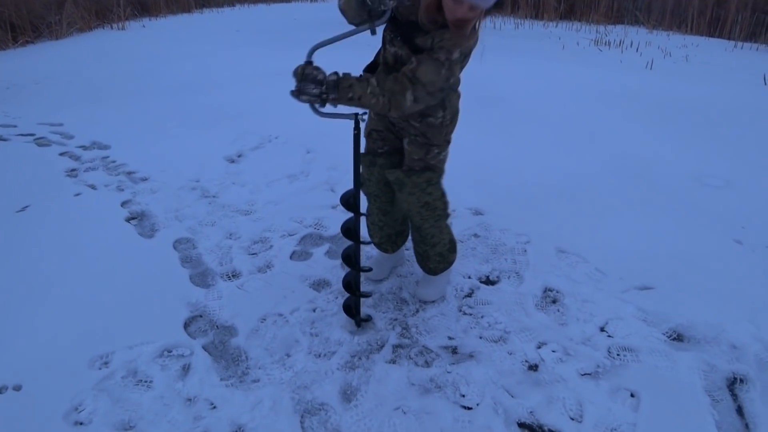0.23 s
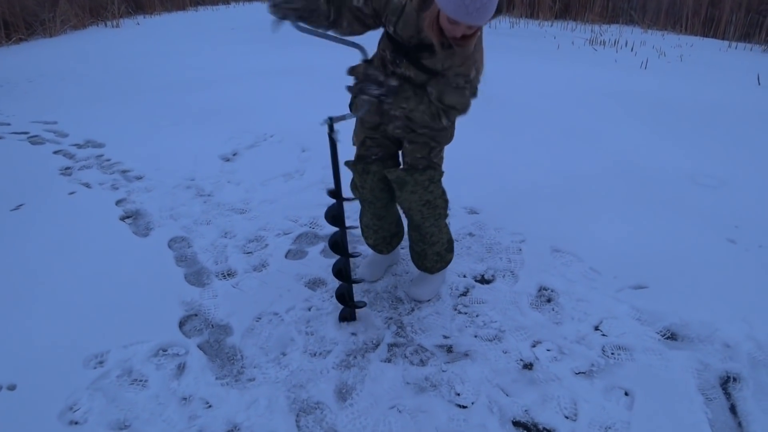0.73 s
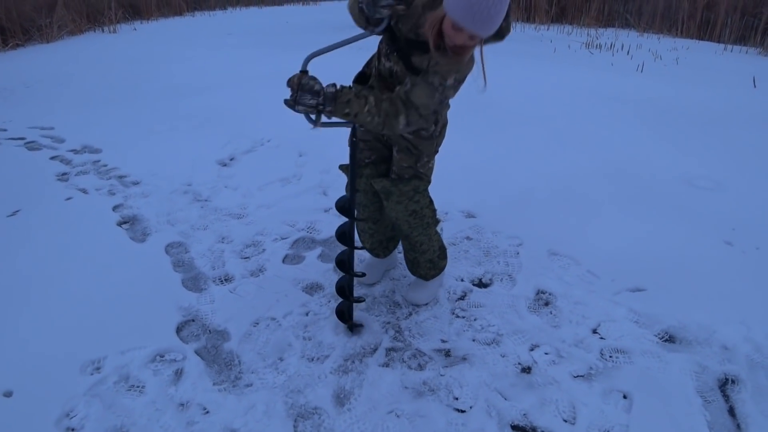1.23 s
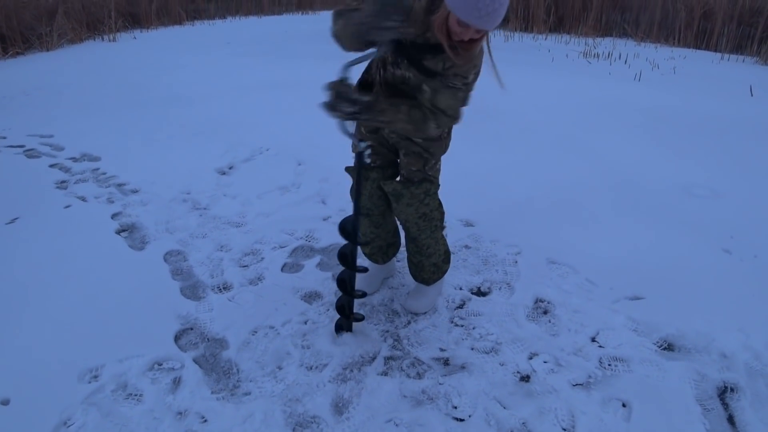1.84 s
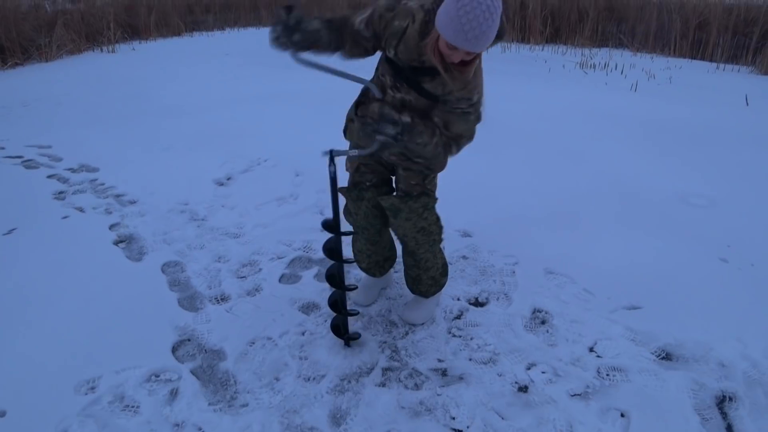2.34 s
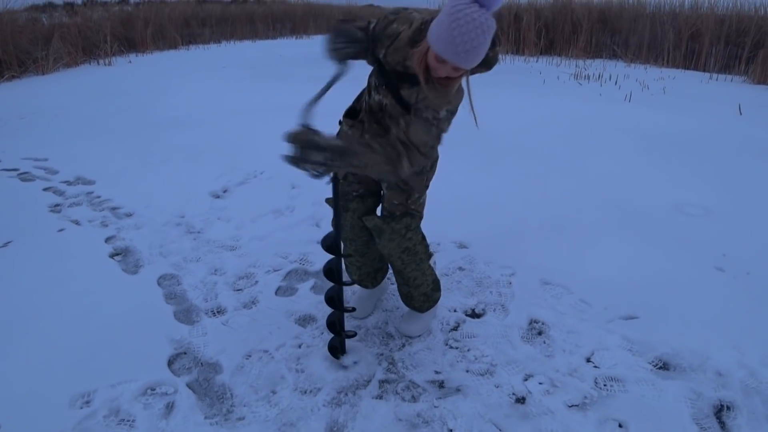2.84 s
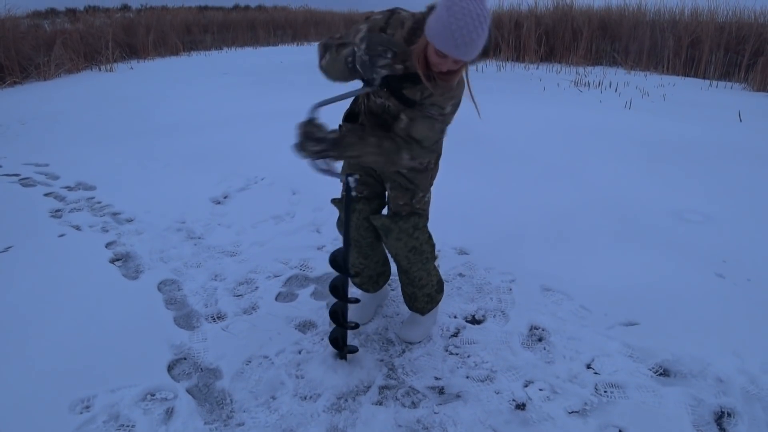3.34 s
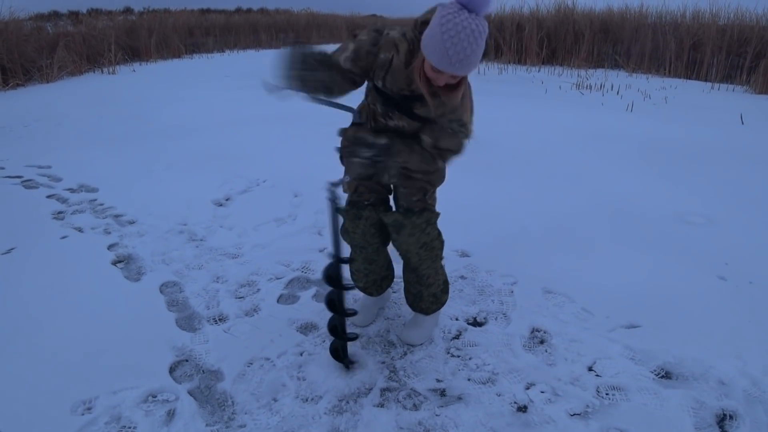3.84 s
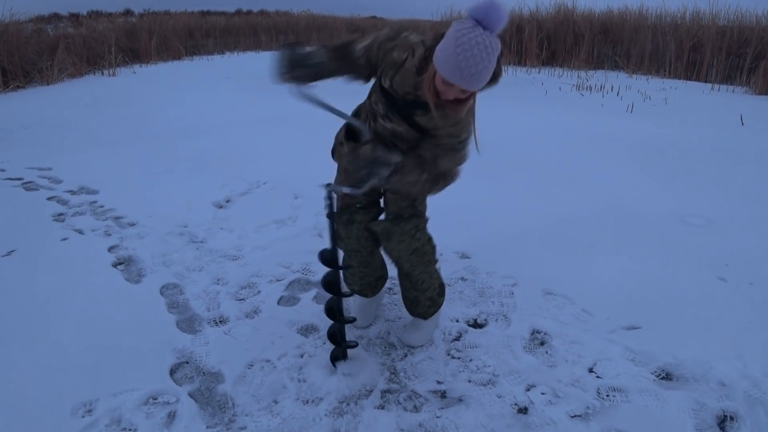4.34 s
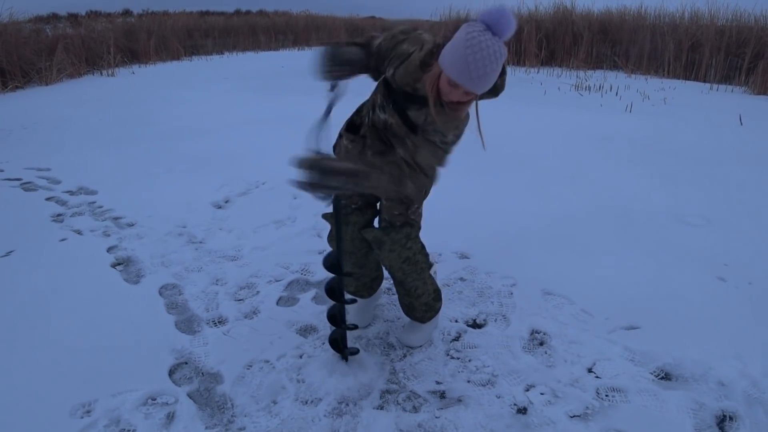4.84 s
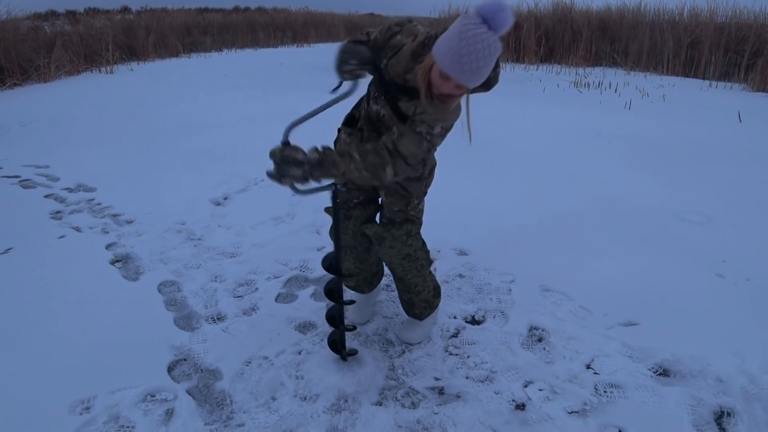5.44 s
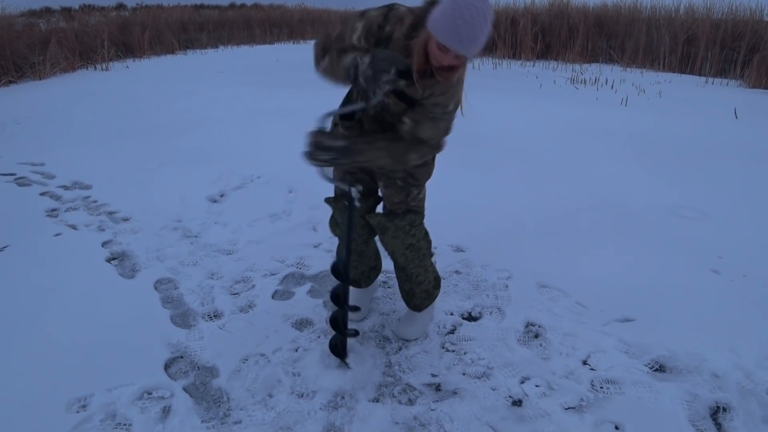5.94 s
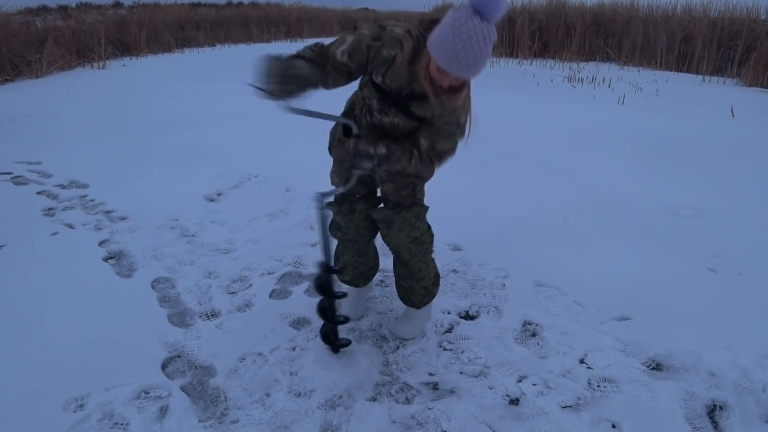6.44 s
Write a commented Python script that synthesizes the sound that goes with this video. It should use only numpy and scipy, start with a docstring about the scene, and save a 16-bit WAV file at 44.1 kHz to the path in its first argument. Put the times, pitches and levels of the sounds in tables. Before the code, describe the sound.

Out on an open, snowy pond, steel blades grind through ice in a gritty, rhythmic rasp as someone turns a hand drill nearby. The cut catches briefly after about a second, cracks back in and carries on a little harder, with sharp snaps of ice, a wavering metallic ring and a few tiny squeaks. The sound is dry, with a low rumble from the ice and faint wind on the microphone.

```python
"""A hand auger is cranked into pond ice a few steps away, in open snowy country.
Its blades break the ice in a dense run of tiny fractures, which hiss, ring the steel spiral and
rumble in the ice sheet. The cut swells and slackens with each turn of the crank; once it stalls,
then bites again with a double crack. Larger chips snap off, a blade squeaks now and then,
and a light wind rumbles underneath."""
import sys
import numpy as np
from scipy import signal
from scipy.fft import rfft, irfft, next_fast_len
from scipy.io import wavfile
from scipy.ndimage import uniform_filter1d, map_coordinates

SR = 44100
rng = np.random.default_rng(int(sys.argv[2]) if len(sys.argv) > 2 else 0)


def store_wav(level_fs):
    """Save 16-bit WAV to argv[1]."""
    pcm = np.round(np.clip(np.atleast_2d(level_fs), -1, 1) * 32767)
    wavfile.write(sys.argv[1], SR, pcm.T.astype(np.int16))


N = 295029
TIME = np.arange(N) / SR


def amp(db):
    """Decibels to gain."""
    return 10 ** (np.asarray(db) / 20)


def unit(x):
    """x scaled to rms 1."""
    return x / np.sqrt(np.mean(x ** 2) + 1e-20)


def automation(rows):
    """Straight ramps through (time, value) breakpoints."""
    return np.interp(TIME, *np.transpose(rows))


def swells(rows):
    """Flat-topped lifts in dB from (start, length, lift) rows."""
    return sum(db * np.exp(-(2 * (TIME - start) / length - 1) ** 4) for start, length, db in rows)


def wobble(rate):
    """A smooth random curve, rate knots a second."""
    return map_coordinates(rng.standard_normal(int(N * rate / SR) + 4), [TIME * rate])


def filtered(x, response):
    """x through a filter given as a complex response of frequency."""
    size = 2 * next_fast_len(N // 2 + SR // 4)
    return irfft(rfft(x, size) * response(np.fft.rfftfreq(size, 1 / SR)), size)[..., :N]


def resonator(modes):
    """Response of a bank of (centre, width, gain) resonances, alternating in polarity."""
    return lambda hz: sum((-1) ** k * amp(db) * 1j * hz * width / (centre**2 - hz**2 + 1j * hz * width)
                          for k, (centre, width, db) in enumerate(modes))


def eq(points, modes=(), ring_db=0):
    """Minimum-phase EQ through (frequency, gain) points, with the power of any resonances added."""
    def response(hz):
        point_hz, point_db = np.transpose(points)
        curve = amp(np.interp(np.log(hz + 1), np.log(point_hz), point_db))
        gain = np.hypot(curve, amp(ring_db) * np.abs(resonator(modes)(hz)))
        cepstrum = irfft(np.log(gain))
        cepstrum[1:len(hz) - 1] *= 2
        cepstrum[len(hz):] = 0
        return np.exp(rfft(cepstrum))
    return response


def driven(force, response, level_db):
    """A body ringing under a force whose strength follows a level curve."""
    return filtered(force * amp(level_db), response) / np.std(filtered(force, response))


def levelled(x, seconds):
    """x with its slow swells evened out, as under the steady push of an arm."""
    power = uniform_filter1d(x ** 2, max(int(seconds * SR), 2))
    return x / np.sqrt(np.abs(power) + 1e-9)


def steady_ring(force, modes, seconds):
    """Modes rung by a force and levelled to an rms near 1."""
    return levelled(filtered(force, resonator(modes)), seconds)


def ring_envelope(level_db, t60):
    """Gain of a mode that builds and fades more slowly than the cut that feeds it."""
    keep, power = 10 ** (-6 / (t60 * SR)), amp(level_db) ** 2
    return np.sqrt(signal.lfilter([1 - keep], [1, -keep], power, zi=[keep * power[0]])[0])


def friction_tone(hz, waver_hz, shimmer_db):
    """A mode kept singing by friction: nearly pure, unsteady in pitch and strength."""
    phase = 2 * np.pi * np.cumsum(hz + waver_hz * wobble(60)) / SR
    return unit(np.sin(phase) * amp(shimmer_db * wobble(28)))


def fractures(rate, spread_db):
    """Tiny cracks of random timing and size, about rate a second; rms 1."""
    happens = rng.random(N) < rate / SR
    polarity = np.sign(rng.standard_normal(N))
    return unit(happens * polarity * amp(spread_db * rng.standard_normal(N)))


# tone of the wind: (frequency [Hz], gain [dB])
WIND_EQ = [(15, -6), (30, -6), (50, -10), (80, -19), (200, -14), (1000, -37), (11000, -44)]
# gusts and lulls: (time [s], relative level [dB])
GUSTS = [(0, -51), (.4, -51), (.8, -61), (1.25, -56), (1.7, -67), (2.03, -50), (2.2, -62), (2.8, -53),
         (3.15, -63), (3.9, -51), (4.1, -64), (4.8, -55), (5.05, -65), (5.27, -54), (5.57, -74),
         (6.69, -65)]


def breeze(width):
    """A bed of light wind rumbling on the microphone, in stereo."""
    noise = rng.standard_normal(N) + width * rng.standard_normal((2, N))
    return amp(automation(GUSTS) + 6) * unit(filtered(noise, eq(WIND_EQ)))


def snow_scatter(x, t60):
    """Short reflections off the snow and the person cranking, shifting as they move."""
    t = np.arange(SR // 16) / SR
    tails = rng.standard_normal((6, len(t))) * 10 ** (-3 * t / t60) * (t > .002)
    tails /= np.linalg.norm(tails, axis=1, keepdims=True)
    paths = signal.fftconvolve(x[None], tails, axes=1)[:, :N]
    blend = np.array([wobble(12) for _ in tails])
    return (paths * blend).sum(axis=0) / np.linalg.norm(blend, axis=0)


# dull knocks in the ice: (time [s], pitch [Hz], level [dB], t60 [s])
THUDS = [(1.258, 60, -33, .06), (1.292, 320, -31, .05)]


def thuds():
    """The ice sheet gives low, damped thuds as weight shifts on the stalled auger."""
    out = np.zeros(N)
    for start, hz, db, t60 in THUDS:
        age = np.maximum(TIME - start, 0)
        out += amp(db - 60 * age / t60) * np.sin(2 * np.pi * hz * age)
    return out


# a blade skates: (start [s], length [s], start pitch [Hz], end pitch [Hz], relative level [dB])
SQUEAKS = [(3.658, 0.059, 4930, 4980, -32), (5.724, 0.079, 4580, 5000, -31), (5.804, .045, 5960, 6150, -33)]


def squeaks():
    """Brief stick-slip whistles that rise with the blade's speed."""
    out = np.zeros(N)
    for start, length, start_hz, end_hz, db in SQUEAKS:
        progress = np.clip((TIME - start) / length, 0, 1)
        hz = start_hz + (end_hz - start_hz) * progress + 55 * wobble(400)
        envelope = np.sqrt(4 * progress * (1 - progress))
        out += amp(db + 10.5) * envelope * np.sin(2 * np.pi * np.cumsum(hz) / SR)
    return out


def chirps(rate, centre_hz, glide):
    """A spray of tiny stick-slip whistles, each sliding in pitch; rms 1."""
    t, out = np.arange(SR // 16) / SR, np.zeros(N + SR)
    for start, pitch, slide, life, size in rng.random((int(rate * N / SR), 5)):
        progress = np.minimum(t / (t[-1] * (.3 + .7 * life)), 1)
        hz = centre_hz * 2 ** (1.2 * (pitch - .5)) * (1 + glide * (2 * slide - 1) * progress)
        envelope = (.5 + size) / (1 + pitch) * np.sin(np.pi * progress)
        out[int(start * N):][:len(t)] += envelope * np.sin(2 * np.pi * np.cumsum(hz) / SR)
    return unit(out[:N])


# turns of the crank, from dead point to dead point: (start [s], push at mid-turn [dB])
TURNS = [(-.4, -1.5), (.3, 1.3), (1.27, 2), (2.07, 3.5), (2.77, 4.5), (3.45, 4.5), (4.17, 5), (4.72, 4.5),
         (5.36, 3), (6.12, 5)]
LAST_TURN_S = .66


def crank():
    """The crank's angle in turns, and the arm's push in dB, which peaks mid-turn."""
    starts, pushes = np.transpose(TURNS)
    turn = np.interp(TIME, [*starts, starts[-1] + LAST_TURN_S], np.arange(len(starts) + 1))
    push = np.take(pushes, turn.astype(int), mode="clip") * np.sin(np.pi * turn) ** 2
    return turn, push


# the blades lose grip, mostly near a dead point: (time [s], half length [s], relative depth [dB])
SLIPS = [(0.102, .035, 2.5), (0.345, 0.11, 3.5), (0.833, 0.056, 2), (1.095, 0.058, 2.5),
         (1.204, 0.016, 12.5), (1.334, 0.043, 7.5), (2.075, 0.033, 3.5), (2.78, 0.037, 1.5),
         (3.43, 0.074, 1.1), (4.177, 0.072, 2), (4.716, 0.034, 3), (5.352, 0.091, 3.5), (5.456, 0.015, 3.5),
         (6.045, 0.046, 5), (6.16, 0.069, 4.5), (6.642, 0.018, 2)]
# how each layer rides the crank: (base level [dB], push [dB/dB], slip [dB/dB], surface lift [dB])
LAYER_MIX = {"edge": (-22, .5, 1.5, 3), "shavings": (-26.5, 0.72, 1.45, 1.5),
             "chips": (-35.5, 1.44, 1.1, 2.5), "plates": (-25, 0.39, 1.7, 3),
             "spiral": (-27.5, 0.56, 0.8, -0.5), "lowest": (0.37, 0.0026, 1, 0.41),
             "shaft": (-37, -.1, 0.8, -5), "sheet": (-34, 0, 0.44, -3)}
STALL_S, RESTART_S, STALL_DB_PER_S, STALL_DB = 1.2236, 1.303, 750, 27.5
SINK_S = 3.84  # time the blades take to bury themselves


def layer_levels(push):
    """A fader curve in dB for each layer, following the push, the slips, the stall and the sinking."""
    slip = sum(db * np.exp(-((TIME - at) / width) ** 2) for at, width, db in SLIPS)
    stall = np.clip((TIME - STALL_S) * STALL_DB_PER_S, 0, STALL_DB) * (TIME < RESTART_S)
    at_surface = np.clip(1 - TIME / SINK_S, 0, 1)
    return {layer: db + by_push * push - by_slip * slip - stall + surface_db * at_surface
            for layer, (db, by_push, by_slip, surface_db) in LAYER_MIX.items()}


def hardness(depth_db, rate):
    """Random swells in dB as the blades meet harder and softer ice."""
    return depth_db * wobble(rate)


def flight_echoes(x, turn, echo_db):
    """The turning flights reflect the cut along paths that stretch and shrink: a gentle flanging."""
    out = x
    for k, mean_delay_s in enumerate([.0012, .0023, .0035]):
        angle = 2 * np.pi * (turn + k / 3) + .4 * wobble(5)
        delay_s = mean_delay_s + .0003 * np.sin(angle)
        out = out + amp(echo_db) * map_coordinates(x, [np.arange(N) - SR * delay_s], order=3)
    return out * np.std(x) / np.std(out)


# bands the steel beams outward: (centre [Hz], width [Hz], swing [dB], loudest angle [turns])
BEAMS = [(1180, 42, 2.5, 0.88), (1323, 79, 7.5, 0.44), (1466, 71, 3.5, 0.93), (1990, 130, 1.5, 0.23),
         (3130, 96, 3.5, 0.32), (9000, 330, 0, 1), (9600, 400, 1.3, 0.67)]


def beamed(x, turn):
    """Some bands swell and fade as the steel turns toward the listener and away."""
    hz, frame_s, spectrum = signal.stft(x, SR, nperseg=1024)
    angle = np.interp(frame_s, TIME, turn)
    gain_db = 0
    for centre, width, db, facing in BEAMS:
        band = np.exp(-((hz - centre) / width) ** 2)
        gain_db += db * np.outer(band, np.cos(2 * np.pi * (angle - facing)))
    return signal.istft(spectrum * amp(gain_db), SR, nperseg=1024)[1][:N]


# body of the ice sheet: (frequency [Hz], gain [dB])
SHEET_EQ = [(60, -70), (100, -18), (140, -7), (250, -0.5), (340, -2.5), (450, -10.5), (700, 1),
            (1500, -39.5)]


def ice_sheet(force, level_db):
    """The cracks rumble through the ice sheet, the low end of the cut."""
    return driven(force, eq(SHEET_EQ), level_db)


# bending mode of the shaft: (centre [Hz], width [Hz], gain [dB])
SHAFT_MODE = [(1201, 30, 0)]
# the hum swells: (start [s], length [s], lift [dB])
SHAFT_HUMS = [(1.0, 0.18, 10), (1.4, 0.056, 11), (1.855, 0.076, 8.5), (2.555, 0.068, 7), (3.11, 0.054, 5),
              (3.35, 0.084, 8), (4.61, .09, 6), (5.25, 0.12, 8)]


def shaft_hum(force, level_db):
    """The shaft flexes under load and hums."""
    return amp(level_db + swells(SHAFT_HUMS)) * steady_ring(force, SHAFT_MODE, seconds=.17)


# low modes of the spiral, at the surface and sunk in the hole: (centre [Hz], width [Hz], gain [dB])
SHALLOW_MODES = [(643, 51, -12), (708.3, 10.2, -1.5), (876, 16.5, -6), (1068, 16, -14.5)]
SUNK_MODES = [(625, 56, -12.5), (723, 19, 4), (820, 54, -3), (975, 41, -5.5), (1117, 33, -11)]
# the spiral's lowest resonance: (centre [Hz], width [Hz], gain [dB])
LOWEST_MODE = [(560, 68, -1.5), (578.3, 40.2, 7.5)]
# fader ride on that resonance: (time [s], relative level [dB])
LOWEST_RIDE = [(0, -33), (1.15, -33.5), (1.5, -26), (1.7, -33), (2.1, -29), (2.28, -27.5), (2.7, -22.5),
               (2.85, -27), (3.1, -24.5), (3.5, -29.5), (4.0, -23.5), (4.25, -26.5), (4.85, -29.5),
               (5.22, -23), (5.35, -30), (5.9, -23), (6.07, -28), (6.4, -23.5), (6.69, -27.5)]
# the strong mode catches and sings out: (start [s], length [s], lift [dB])
SPIRAL_SINGS = [(.74, 0.097, 9.5), (1.17, 0.049, 7.5), (1.563, 0.036, 10), (2.01, .11, 6.5), (2.33, .14, 5),
                (3.14, .12, 3), (3.333, 0.057, 11), (3.74, 0.052, 7), (3.823, 0.15, 10.5), (4.04, 0.08, 10),
                (4.395, 0.082, 4.5), (4.562, 0.056, 10), (4.982, 0.11, 5), (5.685, 0.041, 10.5),
                (5.9, 0.066, 9.5)]
GRIP_FROM_S, GRIP_FULL_S = 1.2, 2.53


def spiral(force, level_db, lowest_db):
    """The steel spiral sings in one strong mode, with rougher modes on either side."""
    # the wall of the hole grips the sinking spiral, which shifts its weaker modes
    grip = np.interp(TIME, [GRIP_FROM_S, GRIP_FULL_S], [0, 1])
    shallow = np.sqrt(1 - grip) * amp(.5) * steady_ring(force, SHALLOW_MODES, seconds=.13)
    sunk = np.sqrt(grip) * amp(-3) * steady_ring(force, SUNK_MODES, seconds=.108)
    lowest = amp(automation(LOWEST_RIDE) + lowest_db - 2.45) * steady_ring(force, LOWEST_MODE, seconds=.1)
    tone = amp(swells(SPIRAL_SINGS) - 3.5) * friction_tone(hz=727, waver_hz=9, shimmer_db=2.5)
    return ring_envelope(level_db, t60=.037) * (tone + shallow + sunk) + lowest


# modes of the blade plates: (centre [Hz], width [Hz], gain [dB])
PLATE_MODES = [(1362, 90, -10.5), (1516, 67, 1.5), (1575, 18, 1.5), (1639, 51, -6), (1742, 122, -3.5),
               (1874, 46, -2.5), (2011, 48, -6), (2083, 32, -7.5), (2200, 39, -5), (2365, 110, -12)]


def blade_plates(force, level_db):
    """The plates grind in a cluster of rough modes; one purer note rings on when the cut stops."""
    grind = amp(level_db - .5) * steady_ring(force, PLATE_MODES, seconds=.14)
    note = friction_tone(hz=1593, waver_hz=12.04, shimmer_db=7.5)
    return grind + ring_envelope(level_db - 10, t60=.24) * note


# tone of the coarse chips: (frequency [Hz], gain [dB])
RASP_EQ = [(1500, -20.5), (2300, 1.5), (2700, 1.5), (3100, 0), (3600, 4), (4600, -20.5)]


def coarse_chips(force, level_db):
    """Coarse chips rub with a midrange rasp."""
    return driven(force, eq(RASP_EQ), level_db)


# tone of the fine shavings: (frequency [Hz], gain [dB])
SIZZLE_EQ = [(3000, -32), (6000, -4.5), (8200, 4), (8900, 0.5), (9600, 0), (11200, -3)]


def shavings(force, level_db):
    """Fine shavings break away with a bright sizzle."""
    return driven(force, eq(SIZZLE_EQ), level_db)


# tone of breaking ice: (frequency [Hz], gain [dB])
CRUNCH_EQ = [(500, -29.5), (1200, -14), (1700, -1.5), (2200, -4), (2650, -7.5), (3250, -6.5), (3800, 2.5),
             (4900, 0.5), (5350, -0.5), (6300, -3), (7000, 0.5), (7700, -11), (9000, -12.5), (11200, -9.5)]
# high modes of the cutting edges: (centre [Hz], width [Hz], gain [dB])
EDGE_MODES = [(3074, 34, 3.5), (3560, 120, -0.5), (4414, 230, 4), (4560, 60, 10), (4840, 190, 3.5),
              (5050, 120, 6), (5680, 140, 5), (6120, 120, -1), (6770, 135, 2), (7330, 110, 3),
              (7930, 280, -8), (8050, 110, -2), (9200, 75, -10), (9700, 80, -4)]


def cutting_edge(force, level_db, ring_db):
    """Cracks heard straight from the ice and through the high modes of the steel."""
    return driven(force, eq(CRUNCH_EQ, EDGE_MODES, ring_db), level_db)


# the blades catch on a larger chip: (time [s], relative level [dB], t60 [s])
BITES = [(.1695, -17.5, 0.058), (0.323, -6, .09), (.377, 0, 0.051), (.515, -2.5, .063), (0.848, -2, 0.046),
         (1.2141, -20, 0.055), (1.228, -11, 0.03), (1.303, -0.5, 0.031), (1.316, -3, 0.052),
         (1.3653, -8, 0.08), (2.1036, -5, .036), (2.567, -1, .035), (3.406, 3, 0.017), (4.095, -17, .036),
         (4.117, -3, .062), (4.269, -3.5, 0.086), (4.512, -3, .045), (4.794, -11, 0.058),
         (5.2275, -4, .042), (5.2932, -1, 0.033), (5.3853, 0, 0.022), (5.427, -5.5, 0.05),
         (5.472, -4.5, 0.065), (5.7773, -6, .035), (5.9025, -4, .06), (5.94, -3, 0.041),
         (6.0103, -2, 0.042), (6.097, -1, .031)]


def bites(attack_s):
    """Larger chips snap off in bright bursts of cracks that ring the edges and the plates."""
    envelope, t = np.zeros(N + SR), np.arange(SR // 4) / SR
    onset = 1 - np.exp(-t / attack_s)
    for start, db, t60 in BITES:
        envelope[round(start * SR):][:len(t)] += amp(db - 60 * t / t60) * onset
    burst_db = 20 * np.log10(envelope[:N] + 1e-6)
    burst = lambda: fractures(rate=13000, spread_db=1)
    snap = cutting_edge(burst(), burst_db - 11.5, ring_db=-4)
    sizzle = shavings(burst(), burst_db - 16)
    clank = driven(burst(), resonator(PLATE_MODES), burst_db - 24)
    return snap + sizzle + clank


def chipping(rate, t60, spread_db, steady):
    """Envelope of the cut: each chip starts at once and crumbles away, over steady shaving."""
    t = np.arange(SR // 8) / SR
    power = signal.fftconvolve(fractures(rate, spread_db) ** 2, 10 ** (-6 * t / t60))[:N]
    return unit(np.sqrt(np.abs(power) / np.mean(power) + steady))


def auger():
    """The cut: one run of chips drives the edges, the plates, the spiral, the shaft and the ice."""
    turn, push = crank()
    level = layer_levels(push)
    chips = chipping(rate=190, t60=.06, spread_db=3.5, steady=.85)
    cracks = lambda: levelled(chips * fractures(rate=11000, spread_db=2.2), seconds=.06)
    rubbing = lambda: fractures(rate=12000, spread_db=1.5)
    splinters = .33 * fractures(rate=300, spread_db=2.5)
    edge_db = level["edge"] + hardness(depth_db=.56, rate=25)
    crunch = cutting_edge(cracks() + splinters, edge_db, ring_db=-1)
    whistles = amp(level["edge"] - 12.5) * chirps(rate=70, centre_hz=7000, glide=.025)
    fine_cracks = chips * fractures(rate=4500, spread_db=4.5)
    sizzle = shavings(fine_cracks, level["shavings"] + hardness(depth_db=1, rate=20))
    rasp = coarse_chips(rubbing(), level["chips"] + hardness(depth_db=1.5, rate=12))
    grind = blade_plates(cracks() + .72 * rubbing(), level["plates"] + hardness(depth_db=1.08, rate=11))
    hum = shaft_hum(cracks(), level["shaft"])
    rumble = ice_sheet(cracks(), level["sheet"] + hardness(depth_db=1.35, rate=22))
    hiss = flight_echoes(crunch + sizzle + rasp, turn, echo_db=-11)
    ring = spiral(cracks(), level["spiral"], level["lowest"])
    return beamed(hiss + whistles + grind + hum, turn) + ring + rumble


def scene():
    """The auger sits slightly left of centre, its scatter out at the sides, over the wind bed."""
    drill = auger() + bites(attack_s=.0002) + squeaks() + thuds()
    side = amp(-15.5) * snow_scatter(drill, t60=.04)
    pan = amp([[.65], [-.65]])
    return drill * pan + np.array([side, -side]) + breeze(width=.6)


def record(dry):
    """A soft clip rounds the highest peaks, then a steep low-pass trims the top."""
    ceiling, cutoff_hz = .72, 11120
    rounded = dry / (1 + np.abs(dry / ceiling) ** 6) ** (1 / 6)
    return filtered(rounded, lambda hz: np.clip((cutoff_hz - hz) / 200 + .5, 0, 1))


dry = scene()
out = record(dry)
store_wav(out)
```